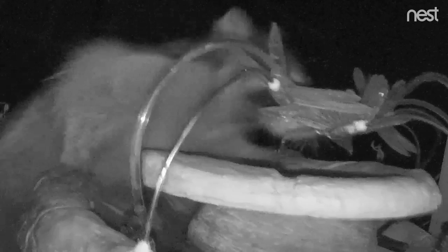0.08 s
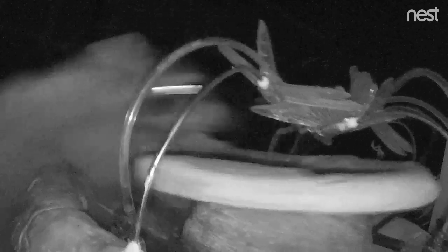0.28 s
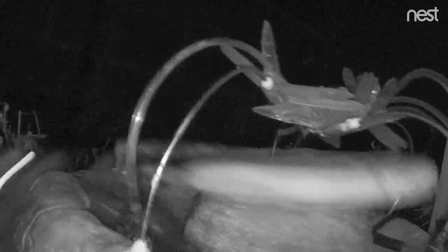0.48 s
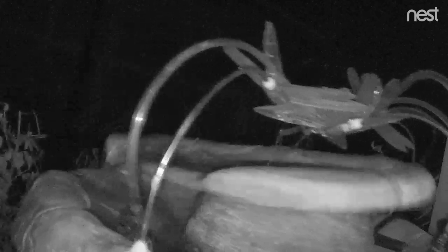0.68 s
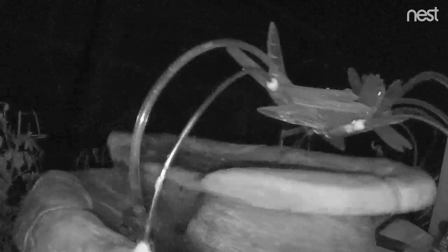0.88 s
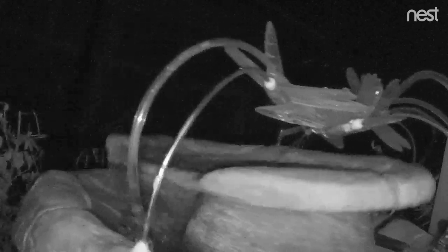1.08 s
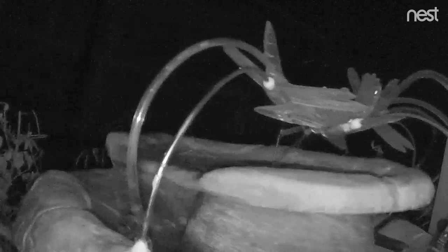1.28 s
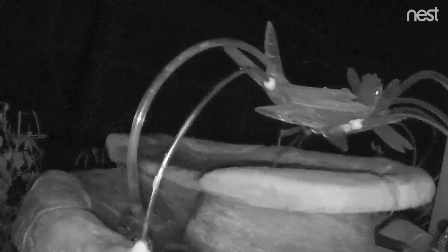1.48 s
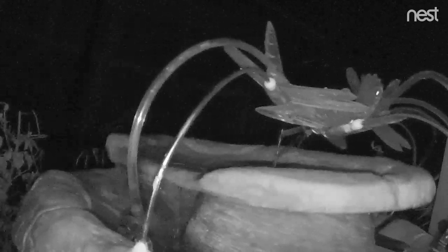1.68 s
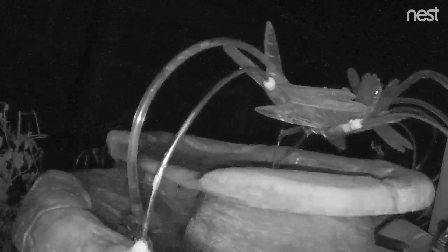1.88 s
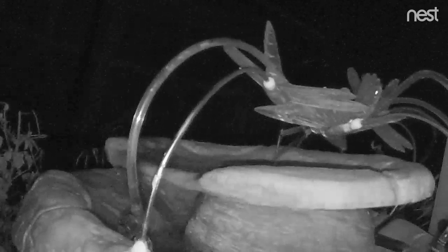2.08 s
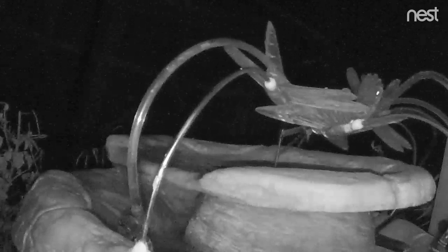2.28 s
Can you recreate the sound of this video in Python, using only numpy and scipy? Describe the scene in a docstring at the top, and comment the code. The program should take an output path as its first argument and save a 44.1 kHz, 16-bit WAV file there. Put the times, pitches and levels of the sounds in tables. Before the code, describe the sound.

A hollow fountain bowl knocks and grinds over its pedestal, spilling water, then drips.

```python
"""At night a garden fountain hisses and trickles, and an animal's claws scratch at it.
The animal drags the hollow top bowl off its seat: the bowl knocks, grinds over its pedestal
and spills bubbling water. After about a second the grinding dies away, the bowl rocks to rest
and drops fall back into the pool over the thin hiss of the jet. A small security camera listens."""
import sys
import numpy as np
from scipy import signal
from scipy.fft import rfft, irfft
from scipy.io import wavfile
from scipy.ndimage import uniform_filter1d

SR = 44100
rng = np.random.default_rng(int(sys.argv[2]) if len(sys.argv) > 2 else 0)


def unload_audio(sound):
    """Save the sound as a 16-bit wav file, at the path given as the first command line argument."""
    columns = np.transpose(np.atleast_2d(sound))
    # keep every value between -1 and 1, then stretch to whole-number steps
    steps = np.round(np.clip(columns, -1, 1) * 32767)
    wavfile.write(sys.argv[1], SR, steps.astype(np.int16))


N = 101429
T = np.arange(N) / SR
TOP_HZ = 7050  # sound above this is cut away

# how strongly water spills, for both spray and bubbles: time_s, level_db
SPILL = [(0, -54.5), (.04, -51.5), (.085, -69), (.125, -53), (.2, -69), (.255, -51.5), (.285, -66.5),
         (.315, -46), (.375, -46), (.48, -46), (.6, -48), (.66, -41.5), (.72, -38.5), (.77, -43),
         (.8, -48.5), (.91, -51), (.965, -45.5), (1.03, -57), (1.08, -52.5), (1.14, -83.5), (1.35, -110)]


def amp(db):
    """Turns decibels into a gain."""
    return 10 ** (np.asarray(db) / 20)


def unit(x):
    """Scales a signal to an average (rms) size of one."""
    return x / np.sqrt(np.mean(x ** 2) + 1e-20)


def level(points):
    """Joins (time_s, level_db) points into a gain over time."""
    return amp(np.interp(T, *np.transpose(points)))


def spectrum(points):
    """Joins (pitch_hz, level_db) points into a tone curve."""
    hz, db = np.transpose(points)
    return lambda f: np.interp(np.log(f + 1), np.log(hz), db)


def colour(x, db_at):
    """Filters a sound so that it follows a tone curve."""
    size = 4096
    log_gain = np.log(amp(db_at(abs(np.fft.fftfreq(size, 1 / SR)))) + 1e-5)
    response = np.exp(np.conj(signal.hilbert(log_gain)))  # rings after a hit, never before
    taps = np.fft.ifft(response).real[:size // 2]
    return signal.fftconvolve(x, taps / np.linalg.norm(taps))[:len(x)]


def add(mix, start_s, sound):
    """Mixes a sound in at a given time."""
    part = mix[max(round(start_s * SR), 0):][:len(sound)]
    part += sound[:len(part)]


def grains(count, per_s, spread_db):
    """Tiny random impacts of uneven size."""
    size = amp(spread_db * np.minimum(rng.exponential(1, count), 4))
    sign = rng.choice([-1., 1.], count)
    return unit(size * sign * (rng.random(count) < per_s / SR))


def burst(rise_s, decay_s):
    """A cluster of tiny impacts that swells and fades."""
    t = T[:SR // 4]
    shape = np.minimum(t / rise_s, 1) * np.exp(-np.maximum(t - rise_s, 0) / decay_s)
    return grains(len(t), per_s=7000, spread_db=0.64) * shape


def flutter(rate_hz, depth_db):
    """A quick random wobble in level."""
    rates = np.geomspace(rate_hz / 5, rate_hz, 20)
    wobble = sum(np.sin(2 * np.pi * (hz * T + rng.random())) for hz in rates)
    return unit(amp(depth_db * unit(wobble)))


def patchy(x, depth_db):
    """Makes narrow bands of pitch swell and fade at random."""
    bands = signal.stft(x, nperseg=1024, noverlap=768)[2]
    swell = uniform_filter1d(rng.standard_normal(bands.shape), size=4, axis=0)  # smooth over pitch
    swell = uniform_filter1d(swell, size=20, axis=1)  # and over time
    bands *= amp(depth_db * np.minimum(unit(swell), 1))
    return signal.istft(bands, nperseg=1024, noverlap=768)[1][:N]


def echoes(x, fade_s):
    """Echoes off the basin and nearby walls, falling 60 dB in fade_s."""
    t = T[:SR // 2]
    taps = grains(len(t), per_s=2000, spread_db=0.92) * amp(-60 * t / fade_s) * (t > .001)
    return signal.fftconvolve(x, taps / np.linalg.norm(taps))[:N]


def water(loudness, tone, per_s, spread_db, flutter_db, patchy_db):
    """Many fine droplets blend into a hiss, coloured by nearby surfaces."""
    droplets = grains(N, per_s, spread_db) * flutter(rate_hz=130, depth_db=flutter_db)
    droplets = patchy(droplets + amp(-1.5) * echoes(droplets, fade_s=0.14), patchy_db)
    hiss = colour(droplets, lambda f: spectrum(tone)(f) - 40 * (f > TOP_HZ))
    return level(loudness) * unit(hiss)


def jet():
    """The jet's droplets make a thin, high hiss."""
    # strength of the hiss: time_s, level_db
    loudness = [(0, -79), (1.2, -65), (1.35, -68), (1.46, -73.5), (1.58, -71.5), (1.66, -81), (1.7, -67),
                (1.78, -69.5), (1.88, -83), (2.0, -77.5), (2.1, -78), (2.18, -84), (2.23, -73),
                (2.3, -69.5)]
    # its tone: pitch_hz, level_db
    tone = [(120, -65), (300, -32), (700, -3.5), (1400, -9.5), (2200, -7), (3200, -4), (4100, -1),
            (4700, 7), (4950, -9), (5600, 2.5), (6100, 4.5), (6400, -6), (7000, 0)]
    return water(loudness, tone, per_s=7000, spread_db=-0.5, flutter_db=3.54, patchy_db=1)


def trickle():
    """Water runs softly into the pool."""
    # strength of the trickle: time_s, level_db
    loudness = [(0, -96), (.2, -68), (1.2, -73.5), (1.4, -77), (1.6, -77.5), (1.72, -72), (1.83, -70),
                (1.95, -78.5), (2.3, -75.5)]
    # its tone: pitch_hz, level_db
    tone = [(60, -59), (160, -20), (265, 4.5), (360, -16.5), (520, -2.5), (850, -0.5), (1400, 3.5),
            (1900, -3.5), (3000, -9.5), (6000, -38)]
    return water(loudness, tone, per_s=2900, spread_db=-1.5, flutter_db=4, patchy_db=2)


def drops():
    """Each drop traps a bubble that rings and rises a little in pitch."""
    # drops landing in the pool: start_s, level_db, pitch_hz
    landings = [(1.052, -61.5, 2670), (1.16, -58, 1410), (1.262, -65.5, 1666), (1.609, -61.5, 1474),
                (1.803, -63, 1150), (1.838, -66, 3583), (1.885, -63.5, 1335), (1.96, -72, 2150),
                (2.056, -59, 1454), (2.106, -67, 2334), (2.117, -64.5, 2207)]
    rise_s, decay_s, glide = 0.00062, 0.0072, 0.24
    out, t = np.zeros(N), T[:SR // 10]
    for start_s, db, hz in landings:
        ring = np.sin(2 * np.pi * hz * t * (1 + glide * t))
        shape = (1 - np.exp(-t / rise_s)) * np.exp(-t / decay_s)
        add(out, start_s, 2 * amp(db) * ring * shape)
    return out + amp(-2) * echoes(out, fade_s=0.14)


def bubbles():
    """Small bubbles ring briefly while water spills; high ones fade sooner."""
    per_s, decay_cycles, tries = 140, 42, 600
    out, t = np.zeros(N), T[:SR // 25]
    for when, pitch, softness, chance in rng.random((tries, 4)):
        hz = 1500 * 4 ** pitch
        if chance < per_s * T[-1] / tries:
            ring = np.sin(2 * np.pi * hz * t) * np.exp(-hz * t / decay_cycles)
            add(out, when * T[-1], amp(-14 * softness) * ring)
    return amp(-6.5) * level(SPILL) * unit(out)


def spray():
    """Spilled water splashes down in droplets of very uneven size."""
    # tone of the splash: pitch_hz, level_db
    tone = [(150, -60.5), (500, -25.5), (1200, -4.5), (2200, -4), (2850, -6), (3450, -3), (3900, -7),
            (4650, 4), (5200, -10.5), (5900, -2.5), (6250, -2.5), (6600, -22.5), (7000, -20)]
    return water(SPILL, tone, per_s=2600, spread_db=4.5, flutter_db=1.44, patchy_db=10.5)


def scratches():
    """Claws and spatters make short bright ticks, each around one pitch."""
    # scratches and spatters: start_s, level_db, pitch_hz, hiss_db, decay_s
    ticks = [(0.029, -52, 1470, -14, 0.027), (0.109, -80, 5700, -3, 0.012), (0.128, -42, 5100, -6, 0.0041),
             (.130, -46, 1810, -12.5, 0.0086), (0.238, -40, 1900, -26.5, 0.012),
             (0.419, -34.5, 3470, -16.5, 0.0054), (0.434, -38.5, 5500, -23, 0.0033),
             (.755, -39, 1130, -23.5, 0.018), (0.511, -46, 3550, -26, 0.0052),
             (0.948, -41.5, 3500, 10, .008), (1.16, -56.5, 4650, -29.5, .006),
             (1.408, -55, 4270, -13.5, 0.0039), (1.595, -54.5, 1780, -14, 0.0066),
             (1.606, -61, 1550, -4, 0.0063), (1.626, -48.5, 5070, -11, 0.0048),
             (1.686, -64, 4370, -25, 0.0071), (1.774, -53.5, 2710, -23, 0.01),
             (1.795, -63.5, 1180, -37, 0.037), (1.885, -66, 1350, -20.5, 0.0032),
             (1.927, -64.5, 5550, -8, 0.0055), (2.046, -59.5, 1394, -19, 0.0055),
             (2.062, -62, 3300, -5, .006), (2.104, -57, 2270, -15.5, 0.0094)]
    width_octaves, rise_s = 0.14, 0.0012
    out = np.zeros(N)
    for start_s, db, hz, hiss_db, decay_s in ticks:
        peak = lambda f: np.exp(-.5 * (np.log2((f + 1) / hz) / width_octaves) ** 2)
        hiss = lambda f: amp(hiss_db) * (f < TOP_HZ) / (1 + (750 / (f + 1)) ** 4)
        tone = lambda f: 20 * np.log10(peak(f) + hiss(f) + 1e-4)
        add(out, start_s, amp(db) * colour(burst(rise_s, decay_s), tone))
    return out


def bowl(force):
    """Scraped or struck, the bowl rings at its own pitches."""
    # the bowl's ringing notes: pitch_hz, level_db, fade_s
    notes = [(330.8, -3.5, 0.14), (386.4, -5.5, 0.26), (466, -1, 0.26), (545.7, -2, 0.1), (674.2, 4, 0.13),
             (758, -2.5, 0.18), (848, 0, 0.12), (996.6, -6, 0.14), (1151.5, -0.5, 0.087), (1445, -6, .12),
             (1463, 3, 0.27), (1630, -4.5, 0.28), (1690, -3.5, 0.45), (2027, -1.5, 0.2)]
    t = T[:SR // 3]
    ring = sum(amp(db - 60 * t / fade_s) / np.sqrt(fade_s) * np.sin(2 * np.pi * (hz * t + rng.random()))
               for hz, db, fade_s in notes)
    return unit(signal.fftconvolve(force, ring)[:N]) * np.std(force)


def rocking():
    """Soft bumps wake the bowl's hollow tone and a dull thud."""
    # the bowl rocking to rest: start_s, level_db, thud_db
    bumps = [(1.06, -51, -54), (1.208, -64, -44), (1.298, -52.5, -26), (1.658, -69, -32),
             (1.739, -55.5, -12), (2.15, -71.5, -3), (2.209, -60, -29)]
    # notes of its hollow tone: pitch_hz, level_db, fade_s
    notes = [(260.7, 1.5, 0.15), (519, -2, 0.2), (643, -19, 0.18), (843, -10.5, 0.09), (1066, -5.5, 0.063),
             (1315, -8.5, 0.11)]
    rise_s, thud_hz, thud_decay_s = 0.013, 70, 0.037
    bass_only = signal.butter(2, thud_hz, fs=SR, output="sos")
    out, t = np.zeros(N), T[:SR // 3]
    for start_s, db, thud_db in bumps:
        ring = sum(amp(note_db - 60 * t / fade_s) * np.sin(2 * np.pi * (hz * t + rng.random()))
                   for hz, note_db, fade_s in notes)
        thud = unit(signal.sosfilt(bass_only, rng.standard_normal(len(t)))) * np.exp(-t / thud_decay_s)
        add(out, start_s, amp(db) * np.minimum(t / rise_s, 1) * (0.94 * ring + amp(thud_db) * thud))
    return out


def knocks():
    """The bowl crunches against its seat and rings."""
    # the bowl's blows: start_s, level_db, bass_db, treble_db, rise_s, decay_s
    blows = [(.231, -38, 5, -6, 0.013, 0.0098), (0.2636, -51.5, 7, -9, 0.0059, .007),
             (.5295, -23, -8.5, -2.5, 0.0032, 0.0034), (.537, -28, -20, -14.5, 0.001, 0.0078),
             (.602, -31.5, 3, -13.5, 0.0079, 0.0058), (.641, -32.5, 13, -2.5, 0.0063, 0.013),
             (0.68, -32, 10, -11, .003, 0.007), (.692, -32, 8, -13, 0.0017, 0.0072),
             (0.71, -37.5, 4.5, -4.5, 0.0054, 0.0048), (.750, -35.5, -1, 8.5, 0.0033, 0.0093),
             (0.764, -38.5, 7.5, 3.5, 0.0026, .007), (.819, -38.5, -0.5, 3.5, 0.0074, 0.013),
             (.842, -42, 3.5, -1, 0.0026, 0.0068), (.943, -45, 1, 1.5, 0.0013, 0.023),
             (.970, -48, -1, -1.5, 0.0039, 0.022), (1.066, -46, 3.5, -13, 0.0045, 0.02),
             (1.738, -62.5, -2.5, -14, 0.0036, 0.033)]
    # tone that all blows share: pitch_hz, level_db
    base_tone = [(30, -37), (150, -20), (260, -4), (450, 0), (1000, 2), (1700, -3), (2200, -8.5),
                 (2900, -10), (4600, -7), (6000, -7.5), (6600, -28)]
    out = np.zeros(N)
    for start_s, db, bass_db, treble_db, rise_s, decay_s in blows:
        bass = lambda f: bass_db / (1 + (f / 550) ** 4)
        treble = lambda f: treble_db / (1 + (2600 / (f + 1)) ** 6)
        tone = lambda f: spectrum(base_tone)(f) + bass(f) + treble(f) - 40 * (f > TOP_HZ)
        add(out, start_s, amp(db) * colour(burst(rise_s, decay_s), tone))
    return out + amp(-4) * bowl(out)


def grinding():
    """The bowl sticks and slips on its pedestal, rumbling as its weight shifts."""
    # strength of the scraping: time_s, level_db
    scrape_level = [(0, -66.5), (.04, -63.5), (.085, -82), (.21, -83.5), (.265, -50), (.29, -63.5),
                    (.325, -46.5), (.41, -48), (.515, -45), (.56, -37.5), (.66, -41.5), (.715, -37),
                    (.79, -42.5), (.85, -44), (.905, -52.5), (.98, -45.5), (1.03, -57), (1.11, -64),
                    (1.2, -93.5), (1.3, -81)]
    # its tone: pitch_hz, level_db
    scrape_tone = [(80, -32), (170, -27), (240, -4.5), (330, -9.5), (600, -1), (1100, 1.5), (1700, -0.5),
                   (2700, -16), (5800, -31), (6800, -40.5)]
    # strength of the low rumble: time_s, level_db
    rumble_level = [(0, -116), (.11, -91), (.14, -62.5), (.2, -83.5), (.25, -60.5), (.3, -73), (.39, -60.5),
                    (.52, -62), (.55, -60.5), (.66, -52), (.77, -51.5), (.86, -53.5), (.92, -67.5),
                    (1, -66), (1.07, -105), (1.66, -105), (1.76, -84), (1.93, -97), (2.17, -82.5),
                    (2.3, -114)]
    # its tone: pitch_hz, level_db
    rumble_tone = [(20, -8.5), (40, -12.5), (80, -0.5), (160, -7), (250, -9), (450, -1.5), (800, -11.5),
                   (2000, -49)]
    slips = grains(N, per_s=1800, spread_db=2.8) * flutter(rate_hz=90, depth_db=0.5)
    scrape = unit(colour(slips, spectrum(scrape_tone))) * level(scrape_level)
    jolts = grains(N, per_s=900, spread_db=0.98)
    rumble = unit(colour(jolts, spectrum(rumble_tone))) * level(rumble_level)
    return amp(-2) * (scrape + rumble) + amp(-3.5) * bowl(scrape + 1.6 * rumble)


def scene():
    """Water, claws and bowl in a small yard."""
    flow = spray() + jet() + trickle()
    hits = knocks() + scratches()
    mix = flow + hits + grinding() + bubbles()
    yard = amp(-8) * echoes(hits, fade_s=0.25)
    return (mix + yard + drops() + rocking())[None]


def record(dry):
    """The camera's microphone loses the deepest bass and the high treble."""
    # how well the microphone hears: pitch_hz, level_db
    microphone = [(15, -10), (40, -0.5), (5800, 0), (6400, -5), (7000, -4.5)]
    gain = amp(spectrum(microphone)(np.fft.rfftfreq(2 * N, 1 / SR)))
    heard = irfft(rfft(dry, 2 * N) * gain)[:, :N]
    treble_cut = signal.firwin(255, TOP_HZ, window=("kaiser", 8), fs=SR)
    return signal.oaconvolve(heard, treble_cut[None], "same")


dry = scene()
out = record(dry)
unload_audio(out)
```